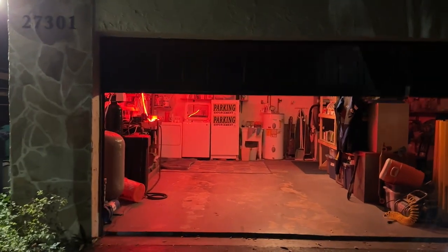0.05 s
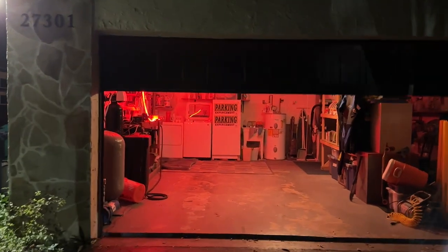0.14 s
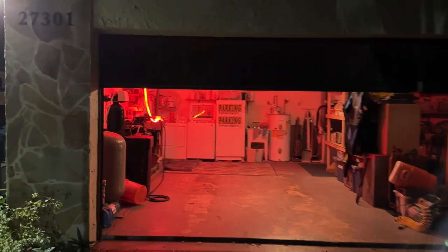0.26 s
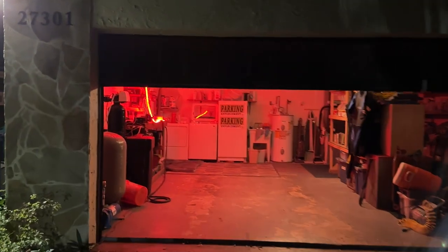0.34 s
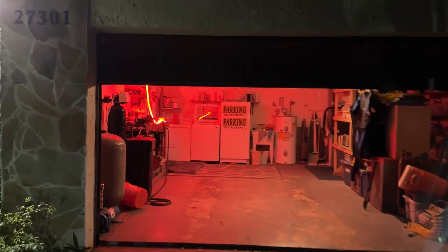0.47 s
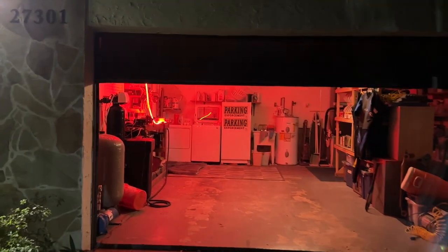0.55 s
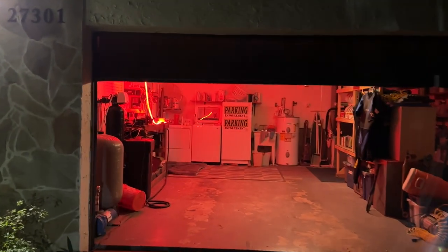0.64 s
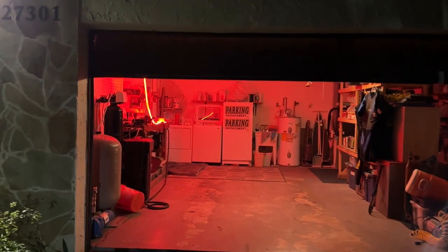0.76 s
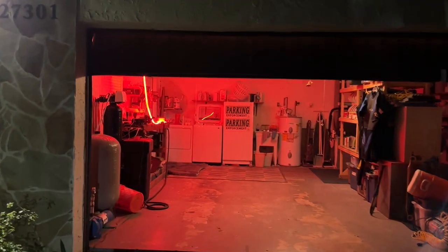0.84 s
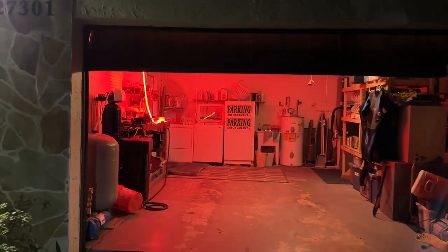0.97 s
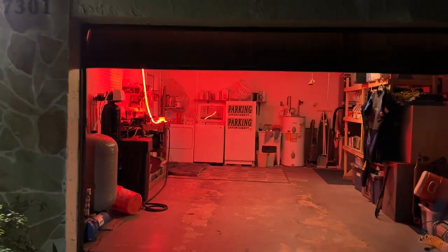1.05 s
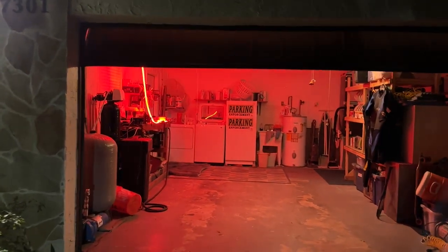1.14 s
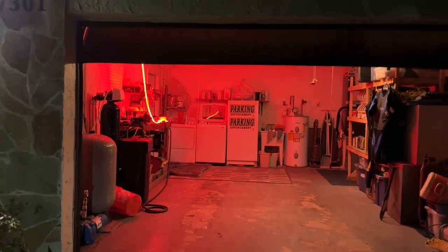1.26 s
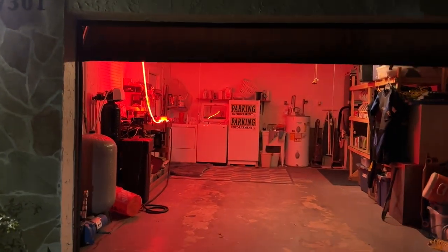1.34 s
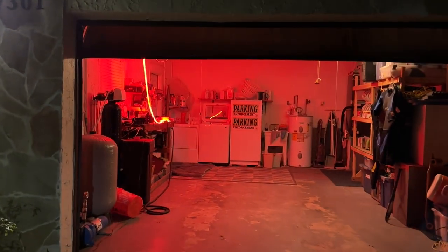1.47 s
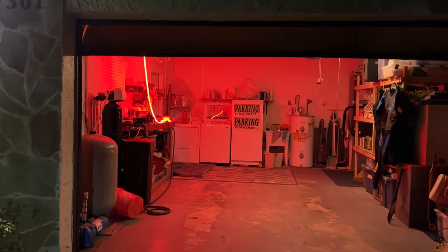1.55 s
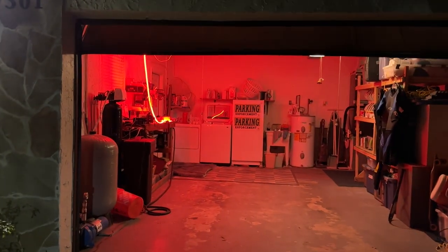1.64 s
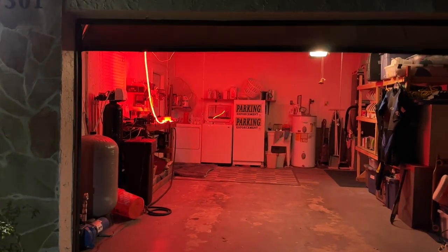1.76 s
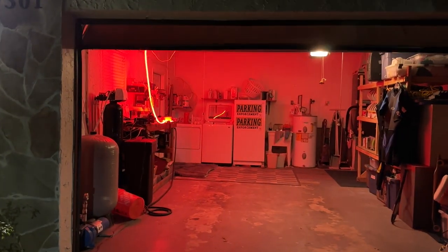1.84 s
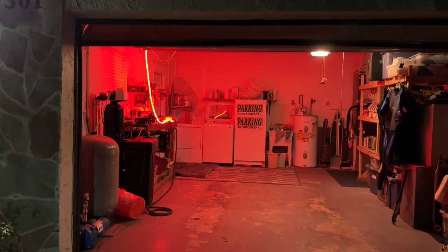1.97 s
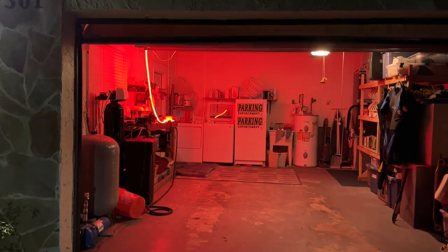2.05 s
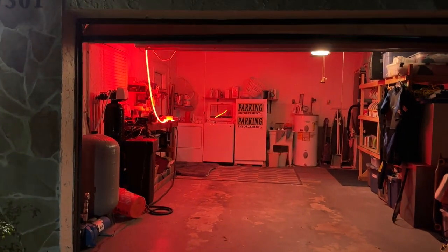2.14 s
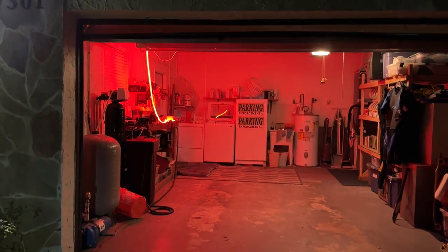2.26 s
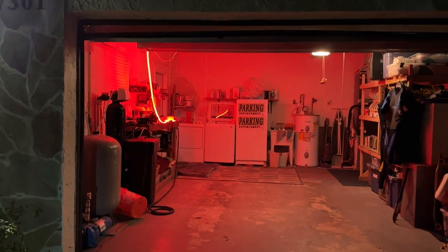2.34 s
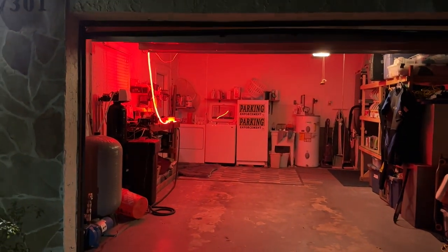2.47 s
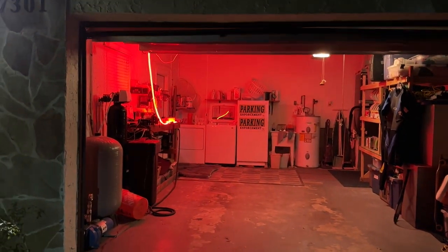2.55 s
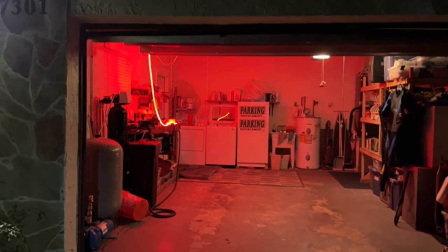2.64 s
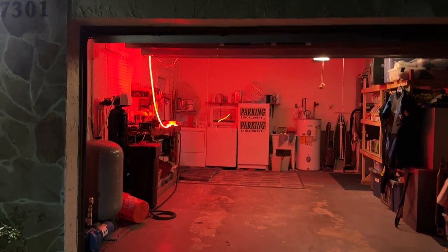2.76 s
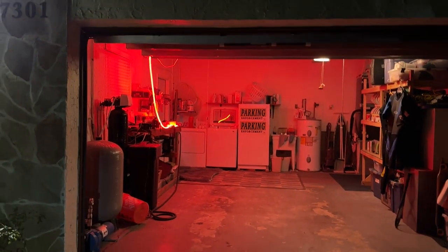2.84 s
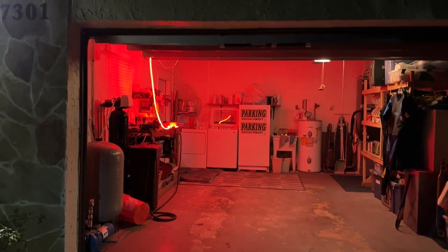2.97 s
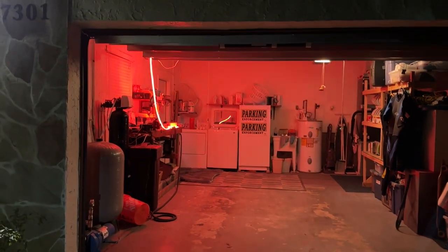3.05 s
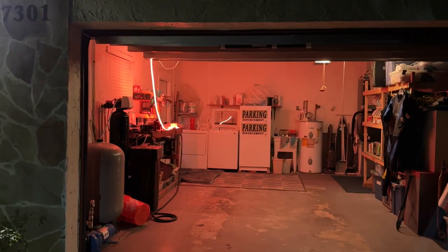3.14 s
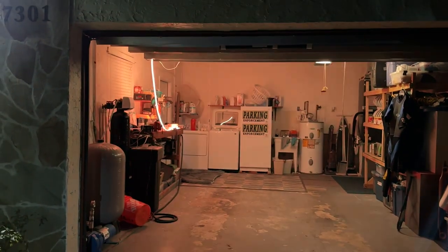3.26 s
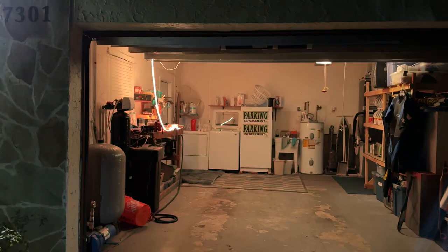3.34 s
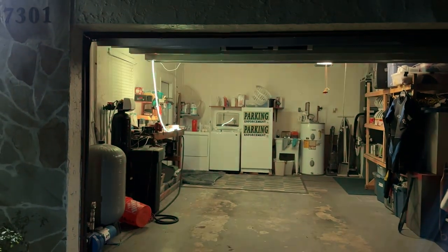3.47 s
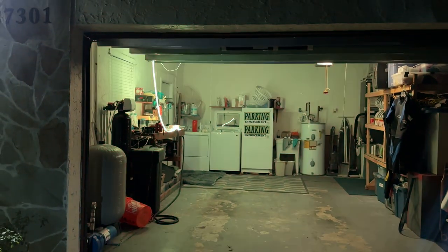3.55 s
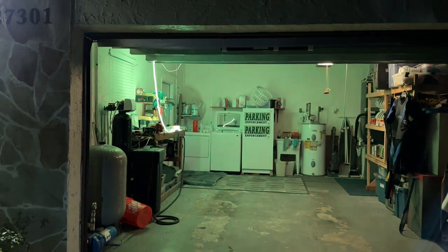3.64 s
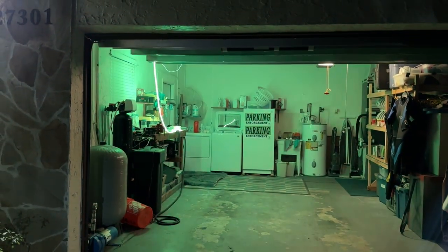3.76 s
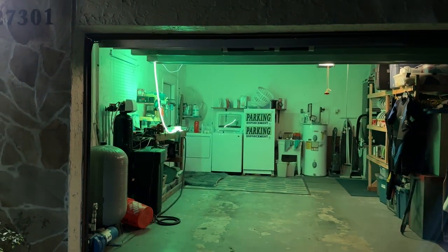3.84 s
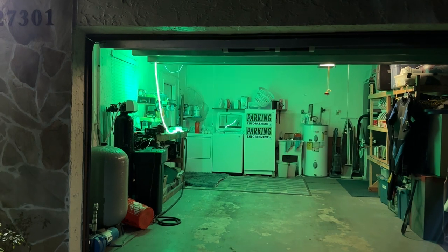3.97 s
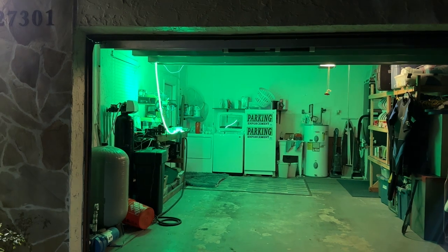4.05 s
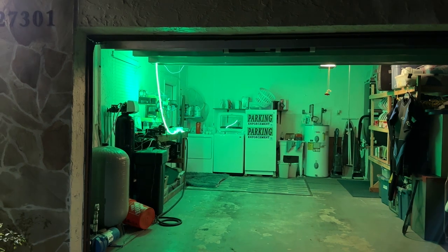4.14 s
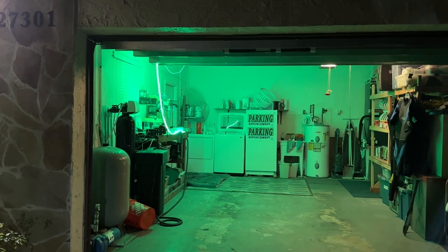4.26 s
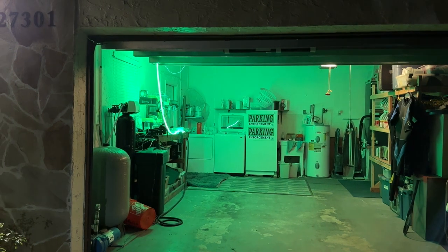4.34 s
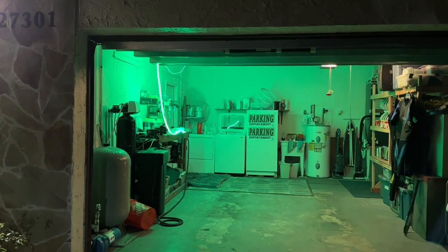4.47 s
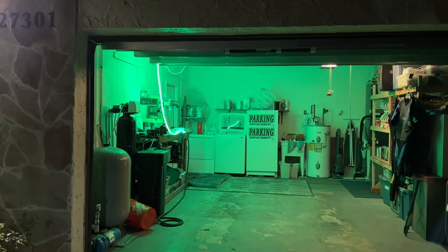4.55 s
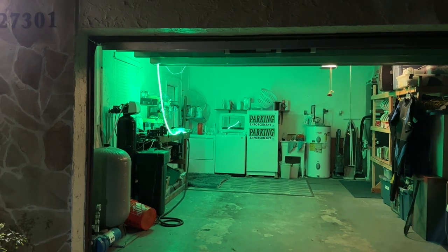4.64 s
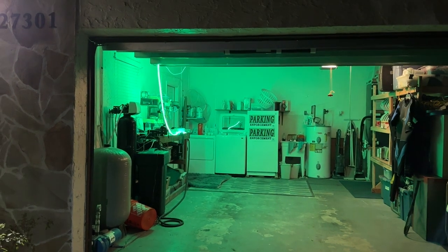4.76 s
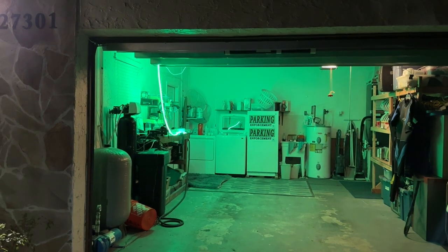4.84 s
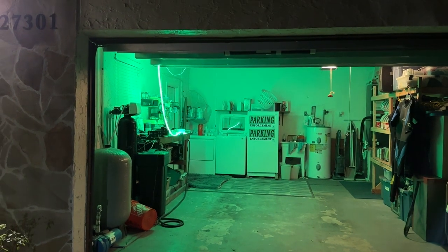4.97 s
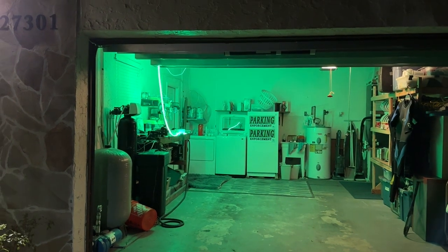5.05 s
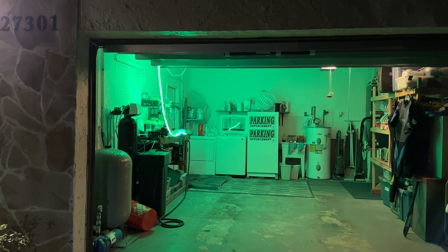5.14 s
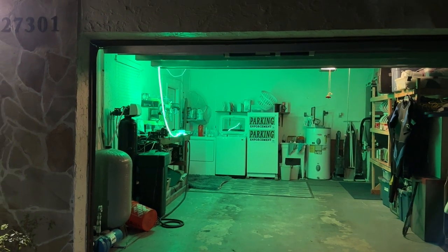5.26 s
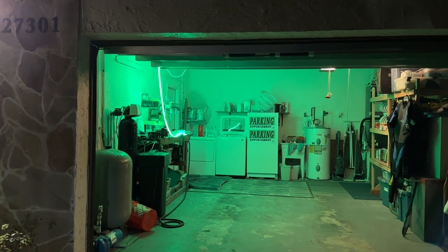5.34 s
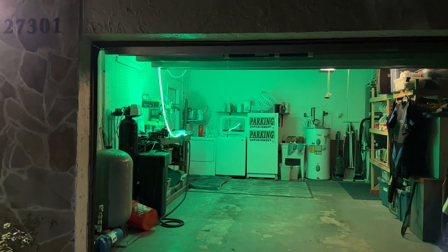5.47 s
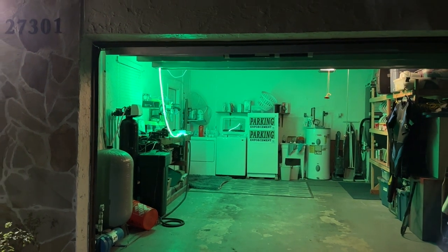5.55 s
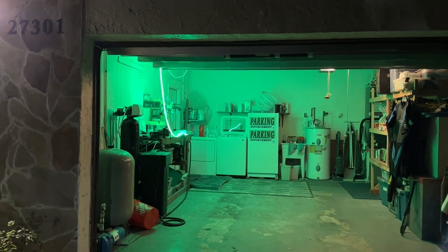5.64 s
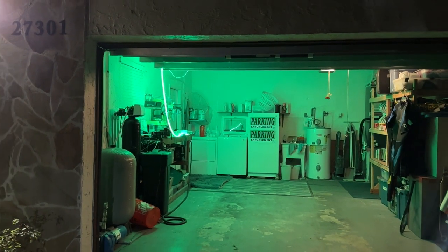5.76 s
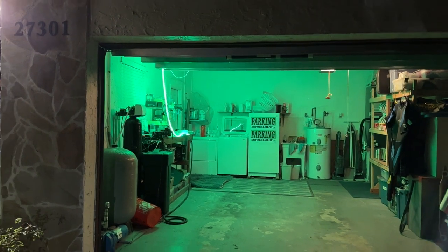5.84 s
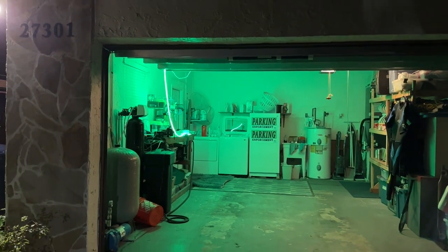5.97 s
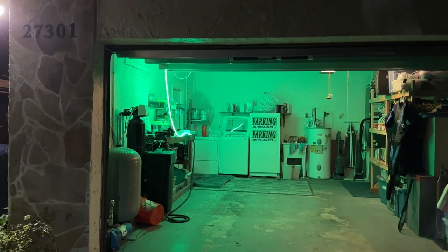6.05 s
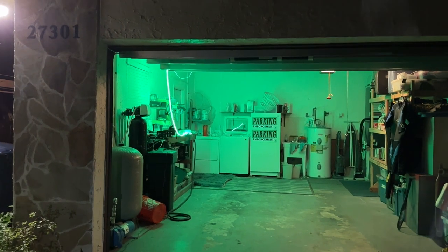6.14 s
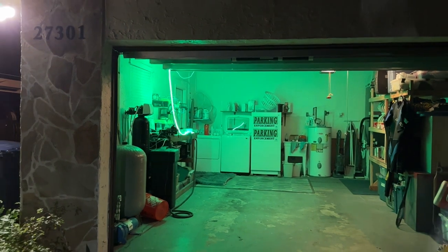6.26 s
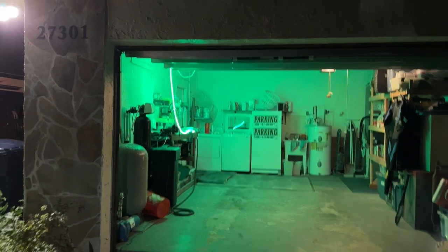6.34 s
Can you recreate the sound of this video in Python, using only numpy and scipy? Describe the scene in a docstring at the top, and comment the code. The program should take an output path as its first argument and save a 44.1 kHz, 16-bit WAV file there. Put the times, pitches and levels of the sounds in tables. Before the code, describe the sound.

Heard from a driveway at night, an electric opener hums low while a sectional garage door rolls up. Rollers chatter, dry tracks squeal roughly, hinges clack and panels bump. After about three seconds it stops, the bare garage rings briefly, and high crickets trill over fading distant traffic, with a few small taps near the end.

```python
"""A squealing roller, a motor's hum and the rattle of a sectional garage door, heard from the driveway at night.
An electric opener pulls the door up: rollers chatter in their tracks and shake the panels, hinges clack
as the sections fold over the bend. The door stops, the garage rings out, and crickets trill over far traffic.
Hum, squeals and crickets are wavering sines; rattles, clacks and bumps are shaped noise and random contacts."""
import sys
import numpy as np
from scipy import signal
from scipy.fft import rfft, irfft, next_fast_len
from scipy.io import wavfile

SR = 44100
rng = np.random.default_rng(int(sys.argv[2]) if len(sys.argv) > 2 else 0)


def master_out(mix):
    """Clip the mix to full scale and print it as 16-bit PCM to the path in sys.argv[1]."""
    frames = np.transpose(np.atleast_2d(mix))
    ceiling = np.clip(frames, -1, 1)
    pcm = np.round(ceiling * 32767).astype(np.int16)
    wavfile.write(sys.argv[1], SR, pcm)


N = 282284  # samples, 6.4 s
DOOR_STOP_S = 3.18

# The garage as a room: hz, t60_s, reverberant_share (of energy, 0 to 1)
GARAGE_ROOM = [(100, 1.4, 0.51), (300, 1.22, 0.58), (700, 1.29, 0.65), (1420, 0.74, 0.32),
               (3000, 0.64, 0.39), (8000, 0.46, 0.56), (15000, 0.16, 0.33)]


def amp(db):
    """Decibels to gain."""
    return 10 ** (np.asarray(db) / 20)


def rms_one(x):
    """Scale to rms 1."""
    return x / np.sqrt(np.mean(x ** 2) + 1e-20)


def seconds():
    """The time of every sample."""
    return np.arange(N) / SR


def curve_in_time(rows):
    """A (time, value) curve at every sample."""
    times, values = np.transpose(rows)
    return np.interp(seconds(), times, values)


def at_hz(points, hz):
    """Read the second column of a table on a log-frequency axis."""
    points = np.array(points)
    return np.interp(np.log(hz + 1), np.log(points[:, 0]), points[:, 1])


def drift(rate_hz):
    """Slow chance with spread 1: noise through two equal poles, made at every 40th sample."""
    step = 40
    pole = np.exp(-2 * np.pi * step * rate_hz / SR)
    noise = rng.standard_normal(N // step + 2002)
    slow = signal.lfilter([1], [1, -2 * pole, pole * pole], noise)[2000:]  # drop the filter's start
    return np.interp(np.arange(N) / step, np.arange(len(slow)), rms_one(slow))


def coloured(x, spectrum):
    """Give a signal a smooth spectrum; rms 1."""
    size = next_fast_len(N + SR // 10)
    hz = np.arange(size // 2 + 1) * SR / size
    return rms_one(irfft(rfft(x, size) * amp(at_hz(spectrum, hz)), size)[:N])


def band(x, low_hz, high_hz, order=3):
    """Butterworth band-pass."""
    edges_hz = [low_hz, min(high_hz, SR / 2 - 500)]
    sos = signal.butter(order, edges_hz, "band", fs=SR, output="sos")
    return signal.sosfilt(sos, x + 1e-18)


def resonance(x, hz, width_hz):
    """A two-pole resonance with gain 1 on top."""
    r = np.exp(-np.pi * width_hz / SR)
    top = np.array([1, 0, -1]) * (1 - r * r) / 2
    return signal.lfilter(top, [1, -2 * r * np.cos(2 * np.pi * hz / SR), r * r], x + 1e-18)


def turning(hz):
    """Phase of something that turns at a changing rate, from a random start."""
    return 2 * np.pi * (np.cumsum(hz) / SR + rng.random())


def swells(rows):
    """Gain of sounds that swell and fade smoothly; rows of middle_s, level_db, length_s."""
    t = seconds()
    return sum(amp(db) * np.exp(-(2 * (t - s) / length_s) ** 2) for s, db, length_s in rows)


def dying(start_s, decay_s, rise_s=.001):
    """Envelope of a blow: quick rise, exponential fall."""
    age = np.maximum(seconds() - start_s, 0)
    return np.minimum(age / rise_s, 1) * np.exp(-np.minimum(age / decay_s, 50))


def contacts(per_s, spread_db):
    """Random small impacts of uneven size and either sign; rms 1."""
    sizes = amp(spread_db * np.minimum(rng.exponential(1, N), 3)) * rng.choice([-1, 1], N)
    return rms_one(sizes * (rng.random(N) < per_s / SR))


def night(drone_hz=195, whine_hz=2196, whine_db=-84):
    """Far traffic is coloured noise that recedes once the door stops; a drone and a faint whine are sines."""
    # Colour of far traffic: hz, level_db
    traffic_colour = [(25, -42), (40, -27), (58, -11.5), (100, 2), (140, 0), (190, 1.5), (300, -4),
                      (450, -6), (750, -3.5), (1100, -5.5), (1700, -12), (2500, -26), (4500, -40.5),
                      (8000, -39), (12000, -57.5), (16000, -55)]
    # A far engine swells: middle_s, level_db, length_s
    drone_swells = [(4.44, -56.5, 0.48), (5.13, -60.5, 0.23)]
    fade_db_per_s = 1.75
    traffic_db = -55 - fade_db_per_s * np.maximum(seconds() - DOOR_STOP_S, 0)
    traffic = amp(traffic_db) * coloured(rng.standard_normal(N), traffic_colour)
    drone = swells(drone_swells) * np.sin(turning(drone_hz * (1 + 0.0075 * drift(2.72))))
    whine = amp(whine_db) * np.sin(turning(whine_hz + 3 * drift(6.2)))
    return traffic + drone + whine


def cricket(stroke_hz, wing_hz, wing_width_hz, unsteady=0.00079, flutter_db=-1.0):
    """Even wing strokes ring a narrow wing resonance: a buzzing cluster of lines, each fading in and out."""
    phase = turning(stroke_hz * (1 + unsteady * drift(2.6)))
    buzz = 0
    for k in range(33, 46):  # the stroke harmonics near the wing resonance
        response = 1 / (1 + (2 * (k * stroke_hz - wing_hz) / wing_width_hz) ** 2)
        line = np.sin(k * phase + .6 * drift(3))
        buzz = buzz + response * amp(2.5 * drift(1.5)) * line
    return rms_one(buzz) * amp(flutter_db * drift(20))


def chirps(width_hz=130):
    """Single insect chirps: brief swells of a narrow, rough note cut from noise."""
    # Chirps: middle_s, level_db, pitch_hz, length_s
    chirp_rows = [(4.198, -66, 5900, 0.033), (5.235, -79, 9430, .035), (6.002, -61, 5780, 0.028)]
    noise = rng.standard_normal(N)
    out = 0
    for s, db, hz, length_s in chirp_rows:
        note = rms_one(band(noise, hz - width_hz / 2, hz + width_hz / 2, order=2))
        out = out + swells([(s, db, length_s)]) * note
    return out


def crickets(swell_db=-1.5, chorus_db=-64.5, chorus_swell_db=-2.2):
    """Three singers in front of a blurred, throbbing chorus of noise, all a little louder at first."""
    # Colour of the far crickets: hz, level_db
    chorus_colour = [(4500, -27), (5100, -31.5), (5480, -12.5), (5680, -6.5), (5850, 2), (6100, -4),
                     (6450, -9.5), (6900, -18.5), (7100, -22.5), (7800, -43)]
    lower = amp(-67 + swell_db * drift(1.5)) * cricket(165.7, wing_hz=6200, wing_width_hz=220)
    higher = amp(-71 + swell_db * drift(1.5)) * cricket(165.5, wing_hz=6450, wing_width_hz=240)
    third = amp(-73) * cricket(162, wing_hz=5770, wing_width_hz=500)
    throb_db = chorus_swell_db * drift(0.93) + 1.5 * drift(30)
    chorus = amp(chorus_db + throb_db) * coloured(rng.standard_normal(N), chorus_colour)
    extra_at_start_db, settle_s = 5, 3.4
    louder_at_first = amp(extra_at_start_db * np.clip(1 - seconds() / settle_s, 0, 1))
    return louder_at_first * (lower + higher + third + chorus) + chirps()


def wall_echoes():
    """A diffuse tail from bare walls: bands of noise, each dying at its own rate."""
    t, tail = np.arange(2 * SR) / SR, 0
    edges_hz = np.geomspace(40, 18000, 14)
    for low, high in zip(edges_hz, edges_hz[1:]):
        t60_s = at_hz(GARAGE_ROOM, np.sqrt(low * high))
        decay = amp(-60 * t / t60_s) * np.clip(t / .012, 0, 1)
        noise = band(rng.standard_normal(len(t)), low, high)
        tail = tail + noise * decay / np.sqrt(np.sum(decay ** 2))
    return tail


def garage(x, count=7):
    """The door travels through the room, so its sound passes from one echo pattern to the next."""
    size = next_fast_len(N + 2 * SR)
    hz = np.arange(size // 2 + 1) * SR / size
    wet = np.clip(at_hz(np.array(GARAGE_ROOM)[:, ::2], hz), 0, 1)  # share of energy
    place = np.clip(seconds() / DOOR_STOP_S, 0, 1) * (count - 1)
    echoes = 0
    for k in range(count):
        nearness = np.sqrt(np.clip(1 - np.abs(place - k), 0, 1))
        echoes = echoes + rfft(x * nearness, size) * rfft(wall_echoes(), size)
    direct = np.sqrt(1 - wet) * rfft(x, size)
    return irfft(direct + np.sqrt(wet) * echoes, size)[:N]


def motor(hum_hz=119.6, trim_db=-1.0, waver_db=2.57, overtone_waver_db=3.0, overtone_db=-41):
    """Hum at twice the mains rate; overtones follow the load less, and each line wavers on its own."""
    # Load on the opener: time_s, hum_db (before the trim)
    load_curve = [(0.04, -39.5), (1.35, -35), (1.55, -43), (1.7, -41.5), (1.83, -47.5), (2.09, -43.5),
                  (2.73, -42.5), (2.76, -41.5), (3.2, -49.5)]
    # Lines of the hum: order (multiple of the hum pitch), level_db (added to the load)
    hum_lines = [(1, 2.5), (2, -9), (3, -17), (4, -21), (5, -15)]
    overtone_follows, run_down_db_per_s = .5, 42
    hum_db = curve_in_time(load_curve)
    phase = turning(np.full(N, hum_hz))
    usual_db = hum_db[:int(DOOR_STOP_S * SR)].mean()
    overtones_db = overtone_db + overtone_follows * (hum_db - usual_db)
    hum = 0
    for k, db in hum_lines:
        wobble, sway = .35 * drift(6), drift(11)
        if k == 1:
            load_db, sway_db = hum_db + trim_db, waver_db
        else:
            load_db, sway_db = overtones_db, overtone_waver_db
        hum = hum + amp(db + load_db + sway_db * sway) * np.sin(k * phase + wobble)
    return hum * amp(-run_down_db_per_s * np.maximum(seconds() - DOOR_STOP_S, 0))


def bumps(rows, rise_s):
    """Soft blows, each a short noise burst in one broad band; rows of start_s, level_db, centre_hz, decay_s."""
    noise = rng.standard_normal(N)
    out = 0
    for s, db, hz, decay_s in rows:
        tone = rms_one(band(noise, hz / 2.04, hz * 1.48, order=2))
        out = out + amp(db) * dying(s, decay_s, rise_s) * tone
    return out


def panels(x):
    """The door answers with a broad colour and a few strong resonances; rms 1."""
    # Colour of the whole door: hz, level_db
    door_colour = [(35, -35), (60, -15.5), (90, -10), (165, -6), (250, -0.5), (380, -5.5), (570, -1.5),
                   (760, -6.5), (1000, 2), (1700, -2), (2000, -12), (2500, -8), (3200, -15.5),
                   (8500, -28.5), (12500, -43), (16000, -49)]
    # Panel and track resonances: hz, width_hz, level_db (against the unresonant sound, before the colour)
    modes = [(244.5, 14, 2), (293, 13, -3.5), (470, 77, -2), (585, 110, -13), (1075, 18, -24),
             (1443, 80, -8.5), (1778, 46, -7.5), (2660, 48, -24), (3730, 220, -4.5), (7800, 140, -14.5),
             (9000, 130, -12.5), (11050, 350, -4.5), (12750, 450, -15)]
    ringing = sum(amp(db) * resonance(x, hz, width_hz) for hz, width_hz, db in modes)
    return coloured(x + ringing, door_colour)


def shaken(per_s, spread_db, low_hz, high_hz):
    """Random contacts heard through the panels in one band; rms 1."""
    return rms_one(band(panels(contacts(per_s, spread_db)), low_hz, high_hz))


def rollers(usual_db=-33, coast_s=0.026):
    """Rollers chatter along the track: heavy bumps shake the panels, finer contacts rattle and hiss, hinges rub."""
    # How hard the rollers run in their tracks: time_s, effort_db
    rolling_curve = [(0.04, -31), (0.32, -38), (0.41, -34), (0.58, -39), (1.15, -36.5), (1.23, -46),
                     (1.61, -41), (1.67, -32.5), (1.92, -36), (1.95, -29.5), (2.43, -28.5), (2.68, -34),
                     (2.91, -25.5), (3.15, -32)]
    # A dry hinge rubs as it folds: middle_s, level_db, length_s
    hinge_rubs = [(1.12, -71, 0.31), (1.57, -50.5, 0.099), (1.77, -49.5, 0.45), (2.4, -49, 0.29),
                  (2.79, -54, 0.13)]
    effort_db = curve_in_time(rolling_curve) - usual_db
    overhead = np.clip(seconds() / DOOR_STOP_S, 0, 1) ** 2.0  # sections come to lie overhead
    # level at the usual rolling + dB per dB of effort + gain overhead
    rumble_gain = amp(-40 + 0.31 * effort_db + 7 * overhead)
    rattle_gain = amp(-35.5 + 1.21 * effort_db)
    hiss_gain = amp(-36.5 + 0.56 * effort_db)
    rub_gain = amp(-59 + 0.067 * effort_db + 6 * overhead) + swells(hinge_rubs)
    rumble = rumble_gain * shaken(per_s=700, spread_db=2.0, low_hz=40, high_hz=713)
    rattle = rattle_gain * shaken(per_s=330, spread_db=2.5, low_hz=612, high_hz=1940)
    hiss = hiss_gain * shaken(per_s=1200, spread_db=-1.0, low_hz=1838, high_hz=6200)
    rub = rub_gain * shaken(per_s=1100, spread_db=0.5, low_hz=6400, high_hz=20000)
    coasting = np.exp(-np.clip((seconds() - DOOR_STOP_S) / coast_s, 0, 50))
    return (rumble + rattle + hiss + rub) * amp(0.3 * drift(17)) * coasting


def squeals(roughness=0.07, trim_db=4.0):
    """A dragging roller sets the track singing roughly; the pitch slides as the roller travels."""
    # Rollers singing: start_s, end_s, start_hz, end_hz, level_db (before the trim)
    squeal_rows = [(0.0, 0.287, 940, 780, -48), (0.248, 0.917, 1609, 1541, -44),
                   (0.836, 0.976, 3750, 3840, -48), (1.034, 1.109, 2527, 2400, -44),
                   (1.5, 1.677, 12200, 12700, -60), (1.818, 2.04, 2905, 2608, -42),
                   (1.94, 2.491, 1624, 1470, -39.5), (2.297, 3.104, 591.8, 544.2, -38.5)]
    t, out = seconds(), np.zeros(N)
    for start, end, from_hz, to_hz, db in squeal_rows:
        swell = np.sqrt(np.abs(np.sin(np.pi * np.clip((t - start) / (end - start), 0, 1))))
        phase = turning(np.interp(t, [start, end], [from_hz, to_hz]))
        rough_hz = roughness * from_hz
        rough_note = drift(rough_hz) * np.sin(phase) + drift(rough_hz) * np.cos(phase)
        out += amp(db + trim_db) * swell * rough_note
    return out


def steel_ring(chatter, ring_hz, ring_width_hz=1100, count=12):
    """One main ring and a few stray ones, different for every clack."""
    stray_hz = rng.uniform(2500, 9000, count)
    stray = sum(resonance(chatter, hz, 200) for hz in stray_hz)
    main = resonance(chatter, ring_hz, ring_width_hz)
    return amp(-7.0) * rms_one(main) + amp(-18.5) * rms_one(stray)


def clacks(decay_s=0.011, knock_s=0.028, sizzle_s=0.016, rise_s=0.0027):
    """A hinge snaps over in a burst of contacts: steel clacks and rings, and the panel behind it knocks."""
    # Hinge clacks: start_s, strength_db, ring_hz, knock_db and sizzle_db (against strength);
    # each part is trimmed again below
    clack_rows = [(0.09, -28.5, 10100, 3, -19), (0.15, -31, 7140, 7.5, -19), (0.341, -32, 10200, 9.5, -16),
                  (0.394, -35, 9700, -4, -2), (0.409, -31, 4580, 14, -1), (0.66, -41, 9800, 9, -8),
                  (1.301, -24, 8800, -7, -41), (1.404, -29, 4470, 0, -7), (1.426, -31, 4300, -11, -4),
                  (1.647, -28.5, 9000, 8, -11), (2.067, -38, 4500, 2, -7), (2.103, -34.5, 4660, 10, -23),
                  (2.35, -33, 4620, 25, -33), (2.434, -27.5, 4580, 1, -18), (2.611, -31.5, 7800, -1, -18),
                  (2.743, -32, 4570, 8, -19), (2.877, -29.5, 4100, 11, -25), (2.955, -26.5, 7540, -2, -11),
                  (2.999, -31.5, 5160, 3, -4), (3.06, -30, 4870, 3, -33), (3.129, -31.5, 8000, -2.5, -13)]
    clack, knock, sizzle, ring = np.zeros((4, N))
    chatter = contacts(per_s=3100, spread_db=-1.0)
    for s, db, ring_hz, knock_db, sizzle_db in clack_rows:
        burst = amp(db) * dying(s, decay_s, rise_s)
        span = slice(int(s * SR), int(s * SR) + SR // 5)  # 0.2 s holds the whole ring
        clack += burst
        ring[span] += burst[span] * steel_ring(chatter[span], ring_hz)
        knock += amp(db + knock_db) * dying(s, knock_s, rise_s)
        sizzle += amp(db + sizzle_db) * dying(s, sizzle_s, rise_s)
    steel = amp(-6.5) * clack * rms_one(band(chatter, 1000, 10860)) + ring
    steel = band(steel, 1000, 10300, order=8)
    fine_grit = rms_one(band(chatter, 9500, 15000, order=2))
    panel_knock = rms_one(band(panels(chatter), 160, 2500))
    return steel + amp(-7.0) * sizzle * fine_grit + amp(-16) * knock * panel_knock


def ragged(x, low_patchy_db=0.5, high_patchy_db=3.0, changes_per_s=14, count=32):
    """As the contact points move, ever different groups of modes are favoured."""
    size = next_fast_len(N + SR // 10)
    spectrum, out = rfft(x, size), 0
    place = np.sqrt(np.linspace(0, 1, len(spectrum))) * (count - 1)  # groups widen with frequency
    for k, patchy_db in enumerate(np.linspace(low_patchy_db, high_patchy_db, count)):
        group = irfft(spectrum * np.clip(1 - np.abs(place - k), 0, 1), size)[:N]
        out = out + group * rms_one(amp(patchy_db * np.clip(drift(changes_per_s), -2, 2)))
    return out


def scene():
    """The door sounds through the garage; motor, night and nearby taps reach the driveway without its echoes."""
    # Small taps nearby: start_s, level_db, centre_hz, decay_s
    tap_rows = [(5.14, -56.5, 700, .02), (5.525, -75, 4500, .02), (5.79, -51, 160, 0.025),
                (5.909, -56, 115, 0.033), (6.28, -50, 530, 0.017), (6.28, -71, 3000, 0.073),
                (6.3, -56.5, 1050, 0.15)]
    # Panels bumping as they fold: start_s, level_db, centre_hz, decay_s
    panel_bumps = [(0.17, -34.5, 3620, 0.023), (0.18, -35.5, 346, 0.041), (0.412, -27, 1310, 0.011),
                   (1.05, -35.5, 3340, .035), (1.075, -32.5, 446, 0.026), (1.304, -30.5, 2680, 0.024),
                   (1.333, -30, 300, 0.012), (1.645, -26.5, 490, 0.022), (1.652, -30, 2500, 0.015),
                   (2.48, -21.5, 1700, 0.017), (2.879, -23.5, 3230, 0.016), (2.995, -20.5, 1320, 0.023),
                   (3.0, -28, 300, 0.034)]
    background = night() + crickets() + bumps(tap_rows, rise_s=0.0047)
    moving_door = ragged(rollers() + clacks()) + squeals() + bumps(panel_bumps, rise_s=0.0052)
    return (background + motor() + garage(moving_door))[None, :]


def record(dry):
    """The microphone drops the deepest bass, and the top is cut steeply."""
    bass_cut = signal.butter(2, 40, "high", fs=SR, output="sos")
    top_cut = signal.ellip(12, .1, 80, 15800, fs=SR, output="sos")  # 0.1 dB ripple, 80 dB down
    return signal.sosfilt(top_cut, signal.sosfilt(bass_cut, dry))


dry = scene()
out = record(dry)
master_out(out)
```